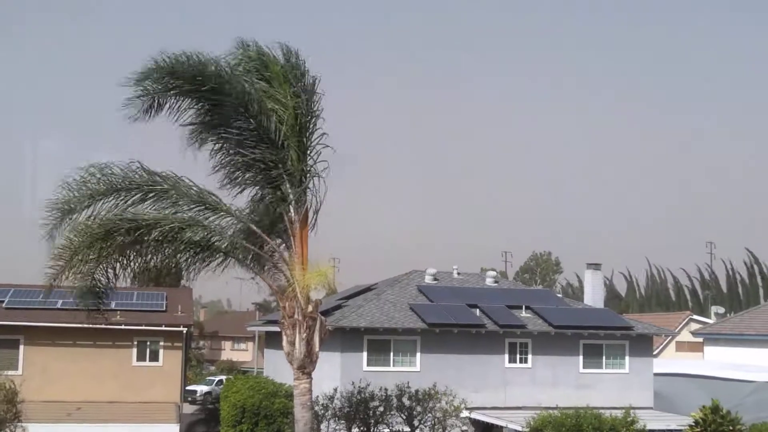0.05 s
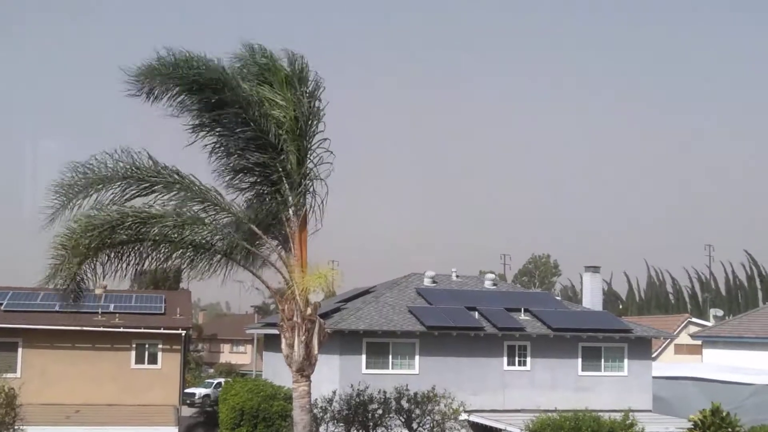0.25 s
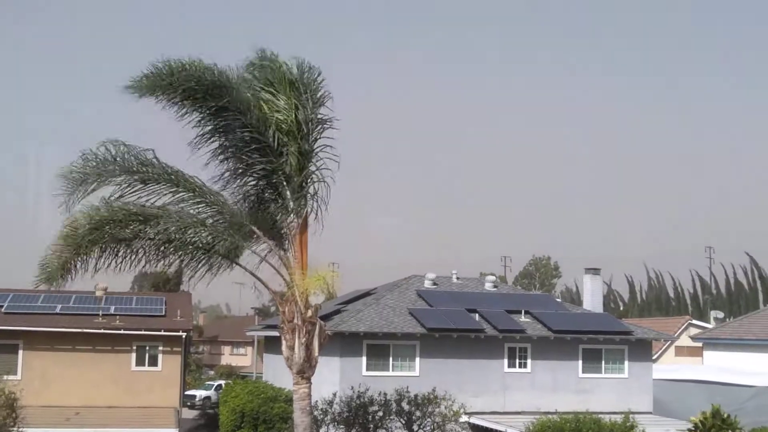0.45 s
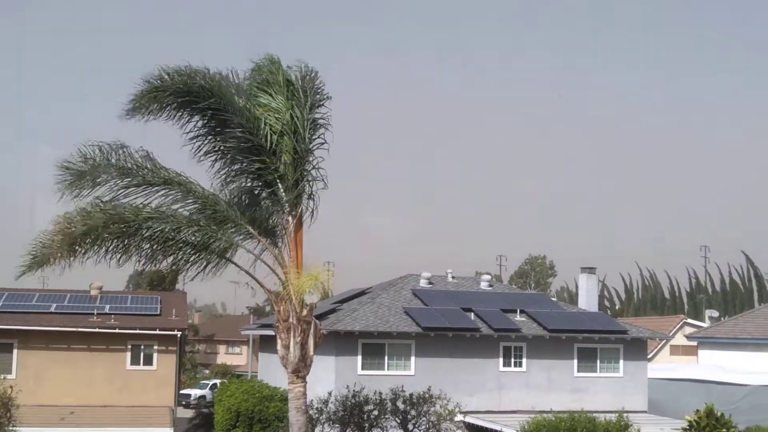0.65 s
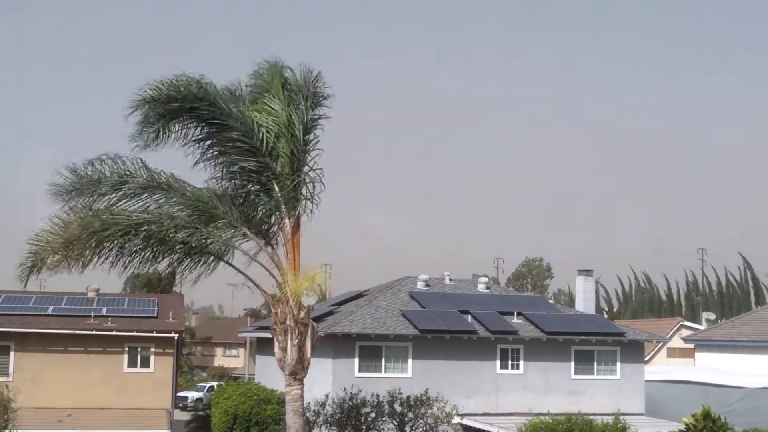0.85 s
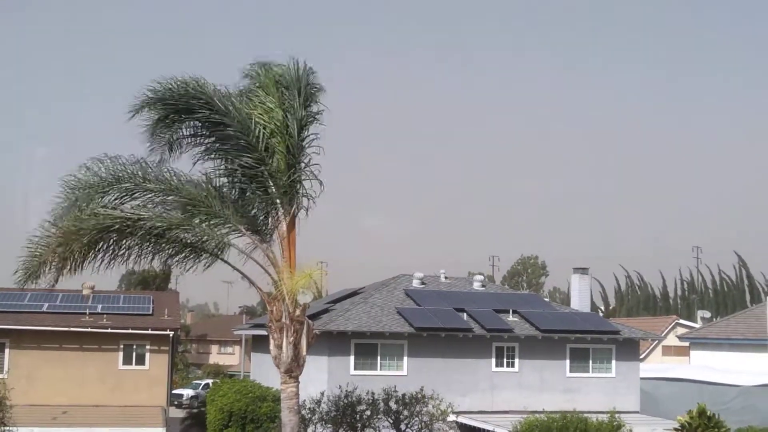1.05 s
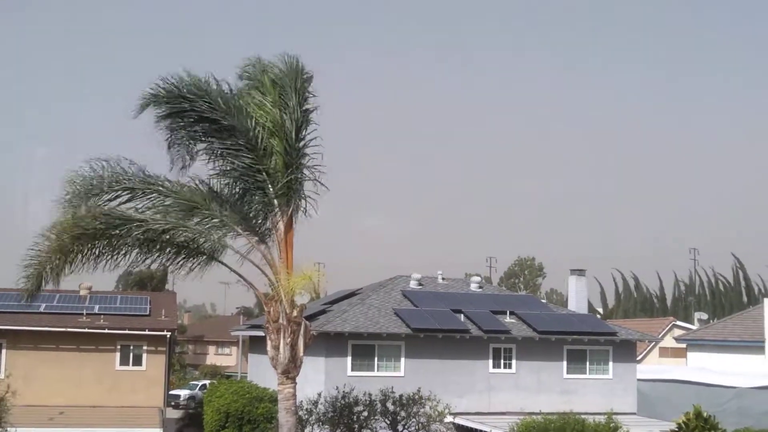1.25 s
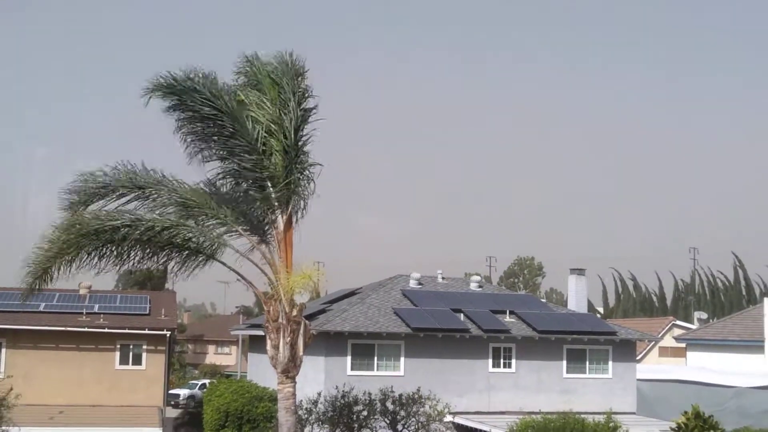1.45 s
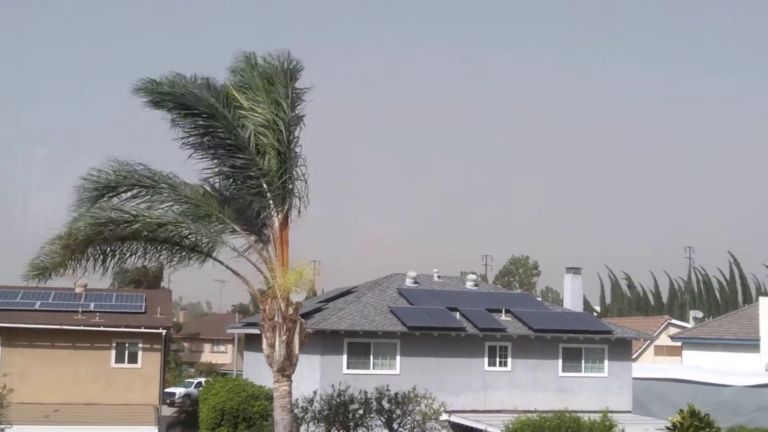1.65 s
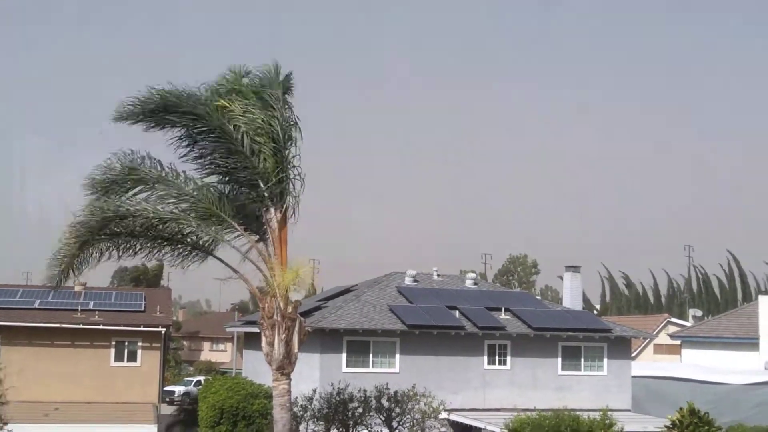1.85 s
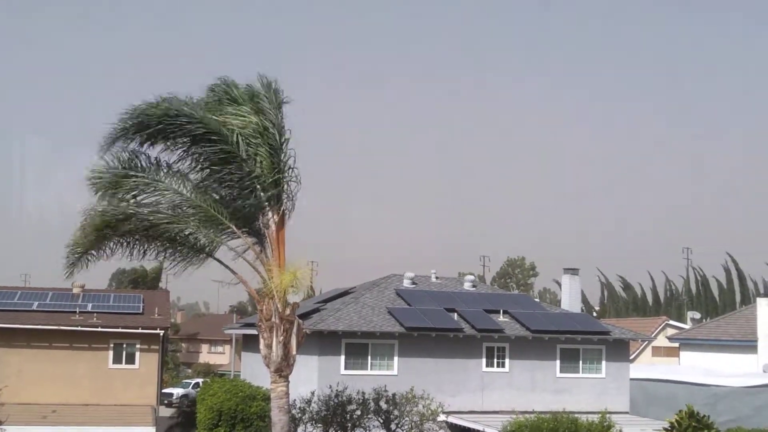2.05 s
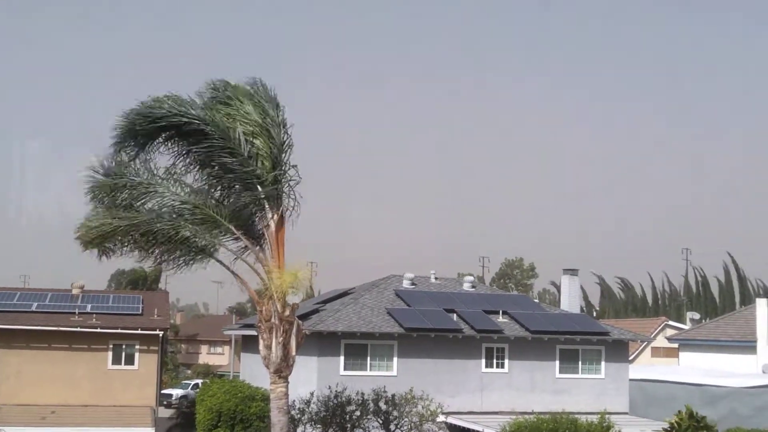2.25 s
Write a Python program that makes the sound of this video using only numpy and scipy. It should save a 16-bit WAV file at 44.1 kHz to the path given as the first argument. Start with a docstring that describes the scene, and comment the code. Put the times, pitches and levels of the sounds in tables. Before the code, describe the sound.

Inside a room, a nearby panel slides along its track twice, first with a bumpy rumble and several thuds, then more briefly with sharp catch clicks. Some way off, wind rustles softly through palm leaves.

```python
"""In a room with palm trees outside, something like a sliding panel is pushed twice, close by.
Its catch ticks, tiny bumps in the track make it rumble, and bigger ones make it knock.
The room rings briefly as it comes to rest. Some way off, strong wind hisses through the fronds,
slaps their leaflets together and whistles faintly on edges, over a low outdoor murmur."""
import sys
import numpy as np
from scipy import signal
from scipy.fft import rfft, irfft, next_fast_len
from scipy.io import wavfile
from scipy.ndimage import uniform_filter1d

SR = 44100
rng = np.random.default_rng(int(sys.argv[2]) if len(sys.argv) > 2 else 0)


def to_wav(sig):
    """Store sig (one row per channel, or 1-D mono) as 16-bit WAV at the path in sys.argv[1].

    Samples outside -1..1 are clipped; the rate is SR.
    """
    pcm = np.clip(np.atleast_2d(sig), -1, 1) * 32767
    pcm = np.round(pcm).astype(np.int16)
    wavfile.write(sys.argv[1], SR, pcm.T)  # frames by channels


N = 101429
T = np.arange(N) / SR
ROOM_FADE_S = 0.55   # a fade time is how long a sound takes to drop by 60 dB
CUTOFF_HZ, PAD_SAMPLES = 15800, 8192


# One list for each push. Each row: time in seconds, relative rumble and bass levels in dB.
PUSHES = [
    [(.245, -44.5, -60), (.285, -37.5, -45.5), (.365, -44.5, -43.5), (.45, -40.5, -49), (.55, -41.5, -44),
     (.68, -47, -50), (.82, -54, -52), (.98, -59.5, -57), (1.06, -70, -56.5), (1.11, -70, -79),
     (1.23, -63.5, -89), (1.36, -80, -72)],
    [(1.485, -52, -60), (1.545, -45, -59), (1.585, -41, -52.5), (1.63, -47, -54.5), (1.675, -49, -43.5),
     (1.74, -57.5, -50.5), (1.785, -60.5, -73), (1.86, -76, -74)],
]
# The notes the panel rings at. Each row: pitch in Hz, width in Hz, relative level in dB.
PANEL_NOTES = [(179.8, 26, 3), (218.2, 37, 3), (275, 28.3, 3), (385, 72.5, -2.5), (463.7, 17, 3),
               (543, 22, 0), (624.6, 39, -3), (781, 54, -6)]
# The tone of dry rubbing. Each row: frequency in Hz, relative level in dB.
SCRAPE_TONE = [(600, -21), (950, 6), (1300, 0.5), (1950, -1), (3500, -11), (10000, -12.5), (13000, -41)]
def sliding_panel():
    """Tiny bumps in the track shake the panel; its higher notes and the scrape need a firm push."""
    split_hz, full_push_db = 430, -36
    level, bass = 0, 0
    for push in PUSHES:
        moving = uniform_filter1d(1. * ((T > push[0][0]) & (T < push[-1][0])), size=256)
        level_db, bass_db = in_time(push)
        level += moving * from_db(level_db)
        bass += moving * from_db(bass_db)
    bumps = clicks(per_s=1500, spread_db=4)
    low_ring = wander(resonate(bumps, [note for note in PANEL_NOTES if note[0] < split_hz]))
    high_ring = wander(resonate(bumps, [note for note in PANEL_NOTES if note[0] >= split_hz]))
    body = steady(band(low_ring, 195, 646), 0.025)
    grit = steady(band(high_ring, 547, 1160), 0.05)
    boom = steady(band(bumps, 74.8, 149), 0.058)
    effort = (level / from_db(full_push_db) + 1e-9) ** 1.13
    panel = from_db(-1.5) * level * body + from_db(-3.5) * bass * boom + from_db(-46.5) * effort * grit
    scrape = from_db(-55) * effort * fluttering_noise(SCRAPE_TONE)
    return panel + from_db(-17) * room(panel) + scrape


# The bigger bumps. Each row: start in seconds, thud level in dB, crack level in dB.
KNOCKS = [(0.2437, -38.5, -47), (.3105, -38.5, -54.5), (0.3834, -33, -51), (.437, -31.5, -49.5),
          (0.5039, -34.5, -53), (.579, -33.5, -55), (.684, -44.5, -79), (1.483, -40, -49.5),
          (1.638, -42.5, -76)]
# The hollow notes of a knock. Each row: pitch in Hz, width in Hz, relative level in dB.
THUD_NOTES = [(415, 45, -5), (628, 114, 5), (770, 280, -6)]
def knocks():
    """Each big bump gives a short hollow thud, a rattle of the panel and a dry crack."""
    hollow = band(resonate(signal.unit_impulse(N), THUD_NOTES), 387, 1450)
    blows, rattles, cracks = np.zeros((3, N))
    for start, thud_db, crack_db in KNOCKS:
        blows[int(start * SR)] += from_db(thud_db)
        rattles += from_db(thud_db - 19.5) * fade(start, fade_s=0.12)
        cracks += from_db(crack_db) * fade(start, fade_s=0.14)
    thuds = signal.fftconvolve(blows, hollow / np.abs(hollow).max())[:N]
    thuds += rattles * steady(band(rng.standard_normal(N), 410, 920, order=3), 0.003)
    return thuds + from_db(-4) * room(thuds) + cracks * fluttering_noise(SCRAPE_TONE)


# The ticks of the catch. Each row: start in seconds, level in dB, fade time in seconds.
TICKS = [(.2428, -36, 0.017), (0.437, -47, 0.013), (0.571, -47, 0.031), (1.4845, -41, 0.016),
         (1.5599, -31, 0.0064), (1.897, -53, 0.013)]
# The bright, high peaks that colour each tick. Each row: pitch in Hz, width in Hz, relative level in dB.
TICK_TONE = [(6100, 700, -7), (7750, 650, 17.5), (11000, 4200, -6)]
def catch_ticks():
    """The catch chatters for a few milliseconds and leaves a soft ring and hiss in the room."""
    def chatter():
        bright_noise = resonate(rng.standard_normal(N), TICK_TONE)
        return steady(band(bright_noise, 1000, 13000, order=8), .004)
    direct, tail_power = 0, 0
    for start, db, fade_s in TICKS:
        direct += from_db(db) * fade(start, fade_s)
        tail_power += fade_s / ROOM_FADE_S * (from_db(db) * fade(start, ROOM_FADE_S)) ** 2
    stereo_chatter = (chatter() + np.array([chatter(), chatter()])) / np.sqrt(2)
    narrow_peaks = [(hz, width / 2, db) for hz, width, db in TICK_TONE[:2]]
    ring = unit_power(resonate(rng.standard_normal((2, N)), narrow_peaks))
    tail = np.sqrt(tail_power / 2) * (ring + fluttering_noise(HISS_TONE))
    return direct * stereo_chatter + from_db(-7) * tail


# How the wind swells. Each row: time in seconds, relative rush and leaf hiss levels in dB.
GUSTS = [(0, -72.5, -73), (.35, -67.5, -72.5), (.85, -69, -72), (1.22, -66.5, -67.5), (1.42, -68, -68.5),
         (1.9, -69.5, -67), (2.3, -68.5, -68)]
# The tones of the rush, hiss and murmur. Each row: frequency in Hz, relative level in dB.
RUSH_TONE = [(700, -25), (900, -4.5), (1900, -0.5), (2400, -4), (3100, -9), (3700, -14), (4500, -18.5)]
HISS_TONE = [(4000, -13), (4900, -4.5), (5600, 1.5), (6400, 6.5), (7000, -4), (7700, 4.5), (8600, -3),
             (10300, 3.5), (11800, -13.5), (13600, -23), (15800, -16)]
MURMUR_TONE = [(30, -9), (95, 2), (180, -3), (400, -9.5), (620, -8), (900, -11)]
def wind():
    """Wind rushes through the treetops and makes leaflets hiss and slap, over a low murmur."""
    rush_db, hiss_db = in_time(GUSTS)
    slaps = np.array([band(clicks(per_s=450, spread_db=4), 4670, 14100, order=3) for side in range(2)])
    leaves = fluttering_noise(HISS_TONE) + from_db(-8) * unit_power(slaps)
    rush = from_db(rush_db + 2) * fluttering_noise(RUSH_TONE)
    murmur = from_db(-67.5) * fluttering_noise(MURMUR_TONE, bands_per_octave=2)
    return from_db(hiss_db - 1) * leaves + rush + murmur


# Faint wind tones. Each row: middle and half length in seconds, pitch at the middle in Hz,
# pitch rise toward the middle in Hz, level in dB.
WHISTLES = [(.87, .03, 2550, 131, -73), (1.275, 0.044, 2490, 280, -68.5), (1.4, 0.049, 2346, 198, -75),
            (1.723, 0.1, 380, -0.5, -60.5), (2.295, 0.1, 382.3, -1, -67.5)]
def whistles():
    """Gusts sing briefly on edges; the high tones rise and fall in pitch as they swell and fade."""
    out = 0
    for middle, half_length, hz, rise_hz, db in WHISTLES:
        swell = np.exp(-((T - middle) / half_length) ** 2)
        pitch = hz * (1 + .022 * drift(60)) - rise_hz * (1 - swell)
        tone = np.sqrt(2) * np.sin(2 * np.pi * np.cumsum(pitch) / SR)
        out += from_db(db + 2 * drift(30)) * swell * tone
    return out


def room(x):
    """The room rings on as a fading wash of echoes, different on each side."""
    tail = rng.standard_normal((2, N)) * fade(0, ROOM_FADE_S)
    return signal.fftconvolve(x[None], tail / np.sqrt(np.sum(tail ** 2) / 2), axes=1)[:, :N]


# One echo for the left, one for the right. Each row: delay in seconds, level in dB.
ECHOES = [(.00221, -10.5), (.00162, -10)]
def close_echo(stereo):
    """A close reflection on each side boosts some high pitches and weakens others."""
    return np.array([side + from_db(db) * np.interp(T - delay, T, band(side, 2000, CUTOFF_HZ))
                     for side, (delay, db) in zip(stereo, ECHOES)])


# How alike left and right sound. Each row: frequency in Hz, likeness (0 unrelated, capped at 0.99).
LIKENESS = [(100, 0.98), (300, 1.4), (650, 0.6), (1400, 0.36), (8000, -0.14)]
def fluttering_noise(tone, bands_per_octave=6):
    """Stereo noise with the given tone; each band flutters in level on its own."""
    low, high = tone[0][0], tone[-1][0]
    edges = np.geomspace(low, high, int(round(bands_per_octave * np.log2(high / low))) + 1)
    out, white = 0, rng.standard_normal((2, 2, N + PAD_SAMPLES))
    for k, (lo, hi) in enumerate(zip(edges, edges[1:])):
        shared, opposed = band(white[k % 2], lo, hi, order=3)[:, PAD_SAMPLES:]
        hz = np.sqrt(lo * hi)
        alike = np.clip(at_hz(LIKENESS, hz), -.99, .99)
        pair = np.sqrt(1 + alike) * shared + np.sqrt(1 - alike) * opposed * [[1], [-1]]
        flutter_db = 1.5 * drift(rate_hz=12)
        out += from_db(at_hz(tone, hz) + flutter_db) * pair
    return unit_power(out)


def wander(x):
    """The panel's pitches shift a little as it slides."""
    speed = 1 + .012 * drift(rate_hz=5)
    return np.interp(np.cumsum(speed) % (N - 1), np.arange(N), x)


def clicks(per_s, spread_db):
    """Random clicks of uneven size."""
    hits = rng.random(N) < per_s / SR
    sizes = from_db(spread_db * np.minimum(rng.exponential(1, N), 4))
    return hits * sizes * rng.choice([-1, 1], N)


def resonate(x, peaks):
    """Make a sound ring at each peak, flipping every other one; narrow peaks ring longer."""
    out = 0
    for k, (hz, width, db) in enumerate(peaks):
        r = np.exp(-np.pi * width / SR)
        ring = signal.lfilter([1, 0, -1], [1, -2 * r * np.cos(2 * np.pi * hz / SR), r * r], x + 1e-18)
        out += (-1) ** k * from_db(db) * (1 - r * r) / 2 * ring
    return out


def fade(start, fade_s):
    """A level that jumps to 1 at the start, then dies away."""
    return (T >= start) * from_db(-60 * np.clip((T - start) / fade_s, 0, 3))


def drift(rate_hz):
    """A smooth random wobble, about 1 in size."""
    step = 40   # samples between random points
    r = np.exp(-2 * np.pi * rate_hz * step / SR)
    slow = signal.lfilter([1], [1, -2 * r, r * r], rng.standard_normal(N // step + 2002))[2000:]
    return np.interp(np.arange(N) / step, np.arange(len(slow)), unit_power(slow))


def band(x, low_hz, high_hz, order=2):
    """Keep the sound between two frequencies."""
    return signal.sosfilt(signal.butter(order, [low_hz, high_hz], "band", fs=SR, output="sos"), x + 1e-18)


def steady(x, window_s):
    """Even out swells slower than the window, leaving a power of 1."""
    return x / np.sqrt(np.abs(uniform_filter1d(x ** 2, int(window_s * SR))) + 1e-20)


def in_time(rows):
    """Join a table's points into one curve over time for each level column."""
    times, *columns = np.transpose(rows)
    return [np.interp(T, times, column) for column in columns]


def at_hz(rows, hz):
    """Look up a frequency in a table, sliding between rows by musical pitch."""
    frequencies, values = np.transpose(rows)
    return np.interp(np.log(hz), np.log(frequencies), values)


def unit_power(x):
    """Scale to an average power of 1."""
    return x / np.sqrt(np.mean(x ** 2) + 1e-20)


def from_db(db):
    """Turn decibels into a multiplier."""
    return 10 ** (np.asarray(db) / 20)


def scene():
    """Mix the wind and the panel; everything reaches the left a little before the right."""
    left, right = close_echo(wind() + catch_ticks()) + whistles() + sliding_panel() + knocks()
    lag_samples = np.round(.00029 * SR)
    return np.array([left, np.interp(np.arange(N) - lag_samples, np.arange(N), right)])


# Which side is louder. Each row: frequency in Hz, left level minus right level in dB.
BALANCE = [(200, 1), (2900, -0.5), (4700, 1), (5600, 2), (6700, 28.5), (7700, 11.5), (8900, -3.5),
           (10200, -7), (12500, -2)]
def record(dry):
    """The microphone's two openings ring at different pitches; the lowest bass and the top are cut."""
    size = next_fast_len(N + PAD_SAMPLES)
    left_gain = from_db(at_hz(BALANCE, np.arange(1, size // 2 + 2) * SR / size))
    gains = np.array([left_gain, np.ones_like(left_gain)]) * np.sqrt(2 / (1 + left_gain ** 2))
    heard = irfft(rfft(dry, size) * gains, size)[:, :N]
    heard = signal.sosfilt(signal.butter(2, 35, "high", fs=SR, output="sos"), heard)
    return signal.sosfilt(signal.ellip(10, .1, 70, CUTOFF_HZ, fs=SR, output="sos"), heard)


dry = scene()
out = record(dry)
to_wav(out)
```